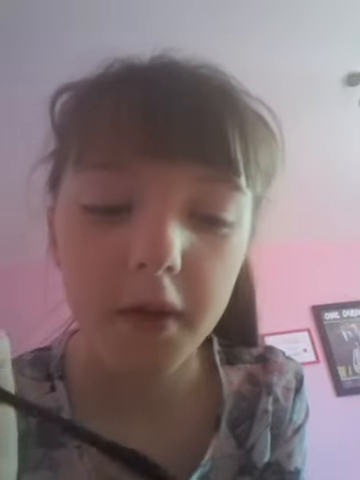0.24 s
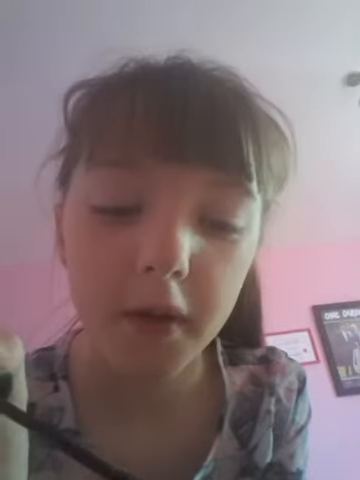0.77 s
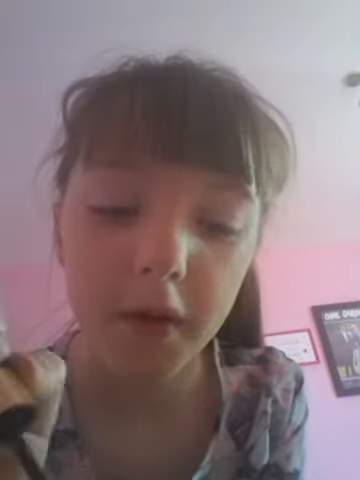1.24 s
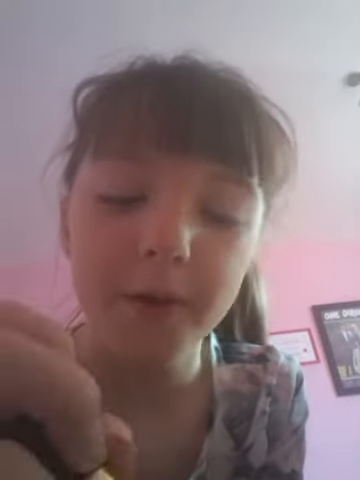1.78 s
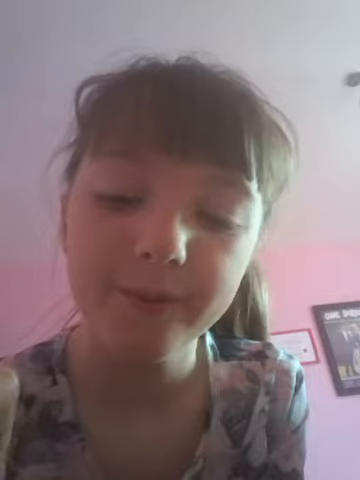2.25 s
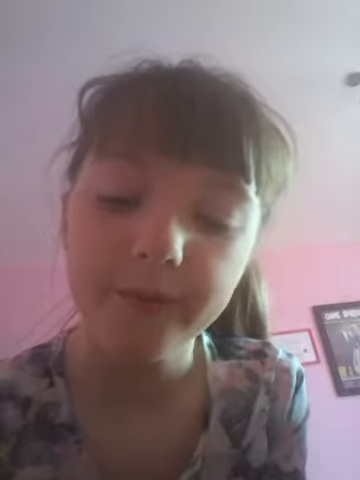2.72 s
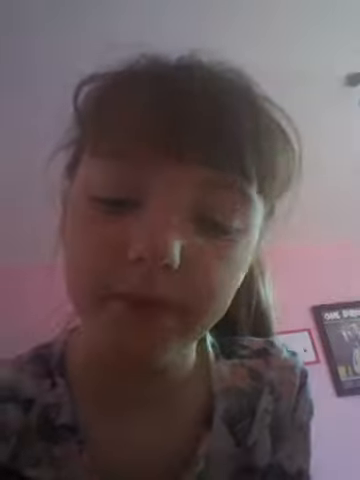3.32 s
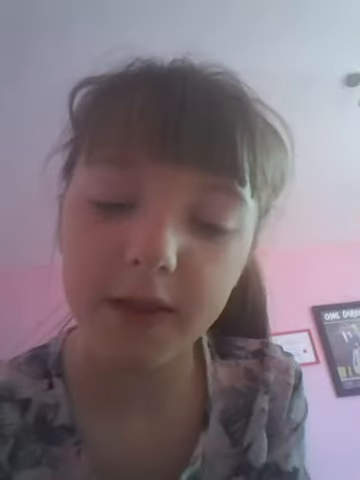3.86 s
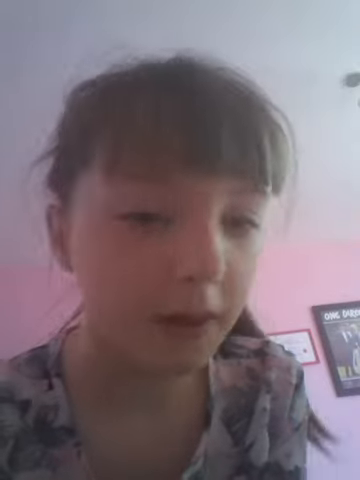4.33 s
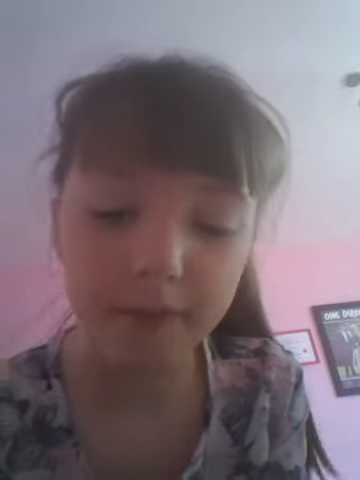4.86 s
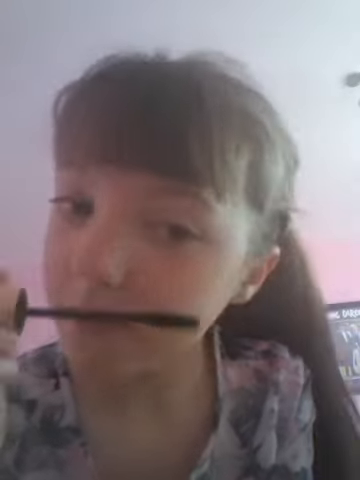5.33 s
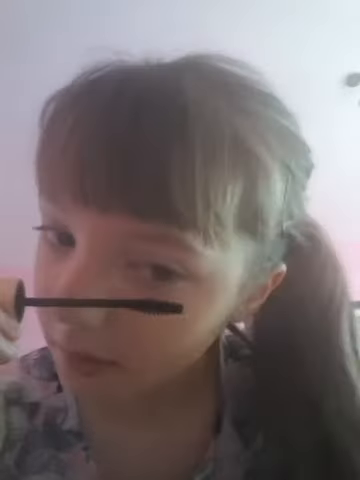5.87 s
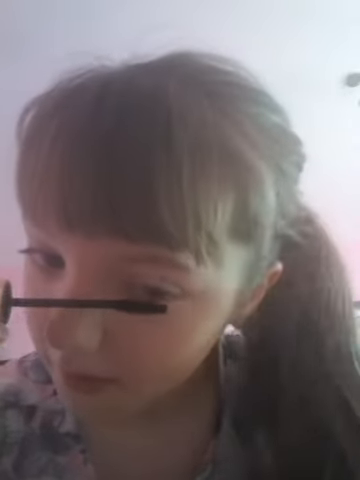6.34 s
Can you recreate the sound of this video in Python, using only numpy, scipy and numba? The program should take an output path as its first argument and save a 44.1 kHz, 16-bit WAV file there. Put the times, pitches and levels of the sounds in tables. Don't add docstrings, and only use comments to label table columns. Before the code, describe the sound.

A mascara tube is handled very close to a stereo phone microphone in a quiet small bedroom. From 0 to 0.9 s there are only faint finger rubs on plastic over low hiss. At about 1.0 s a soft grip bump leads into a crisp bristly pull with a sharp knock at 1.1 s. Clicks crowd together near 1.27 s, and at 1.31 s a hard, bright plastic snap overloads the microphone, by far the loudest moment. Rasping trails off by 1.4 s. A small tick comes at 1.68 s, then gritty brush pulls and clicks at 2.0 and 2.15 to 2.35 s. Light finger shifts and dull bumps follow near 2.8 to 3.1 s, thin rim scrapes at 3.2 to 3.5 s. From 4.2 to 5.6 s the cap twists faintly, with a clear click at 5.15 s. A tap at 5.74 s, last scrapes and finger rubs fade by 6.4 s as gated hiss and rumble sink.

```python
import sys
import numpy as np
from scipy import signal
from scipy.fft import rfft, irfft
from scipy.io import wavfile
from scipy.ndimage import uniform_filter1d
from numba import njit

SR = 44100
rng = np.random.default_rng(int(sys.argv[2]) if len(sys.argv) > 2 else 0)


def undo_db(level):
    steps = np.asarray(level, float) / 20
    return 10 ** steps


def wav_out(sig):
    wavfile.write(sys.argv[1], SR, np.round(np.clip(np.atleast_2d(sig).T, -1, 1) * 32767).astype(np.int16))


N = 290619

# peak t/s, level/dB, rise/s per 20 dB, fall/s per 20 dB, upper ring f/Hz
PULLS = [(1.021, -61, .015, .035, 5400), (1.076, -59, .035, .09, 5500), (1.108, -42, .04, .009, 6000),
         (1.19, -74, .3, .25, 5100), (1.259, -46, .005, .045, 7100), (1.276, -39.5, .016, .024, 5700),
         (1.301, -46.5, .016, .045, 5670), (1.327, -44, .022, .09, 5600), (1.385, -55, .045, .075, 5200),
         (1.636, -67, .06, .11, 5300), (1.679, -61, .05, .06, 5600), (1.975, -56, .004, .09, 6500),
         (1.996, -49.5, .022, .09, 6450), (2.021, -47, .035, .045, 6000), (2.046, -53, .035, .035, 5200),
         (2.171, -69, .025, .09, 5600), (2.216, -63, .045, .11, 4800), (2.261, -57.5, .045, .09, 5000),
         (2.291, -53.5, .035, .09, 5600), (2.313, -50.5, .035, .05, 5684), (2.332, -39.5, .013, .025, 5970),
         (2.342, -44.5, .022, .007, 6500), (2.371, -67, .035, .09, 5800)]
# peak t/s, level/dB, upper ring f/Hz, tube ring above it level/dB
TURNS = [(4.21, -61, 6420, -5.5), (4.268, -62, 5230, -10), (4.398, -67.5, 5300, -3),
         (4.5, -62.5, 5250, -3.5), (4.61, -68, 5300, 3.5), (4.73, -65.5, 5500, -2), (4.8, -68, 5400, 3.5),
         (4.87, -71.5, 5300, -1), (4.956, -61.5, 5500, -5.5), (5.07, -64.5, 5303, -1.5),
         (5.11, -67, 5338, -2), (5.175, -62.5, 5600, -4.5), (5.21, -64.5, 5597, -7), (5.28, -70, 5597, 2),
         (5.331, -64, 5600, -1), (5.433, -68.5, 5706, -2.5), (5.559, -64, 5588, -1),
         (5.61, -69.5, 5600, -2.5)]
# peak t/s, level/dB, upper ring f/Hz
SCRAPES = [
    (3.192, -64, 6090),
    (3.235, -62.5, 6126),
    (3.282, -59, 6220),
    (3.34, -62, 6156),
    (3.396, -60.5, 6097),
    (3.46, -65, 5690),
    (3.528, -63.5, 5910),
    (5.765, -69, 6250),
    (5.86, -72.5, 6150),
    (5.958, -75, 5960),
]
# peak t/s, level/dB, upper ring f/Hz
FINGER_SHIFTS = [(.16, -75, 5974), (.24, -77, 5794), (.338, -76.5, 5796), (.44, -79.5, 5907),
                 (.6, -78.5, 5916), (.67, -75.5, 5800), (.734, -74.5, 5620), (.88, -71.5, 5965),
                 (2.784, -73.5, 6150), (2.874, -71, 5612), (2.932, -71, 6020), (3.0, -72.5, 5812),
                 (3.08, -75, 6030), (3.76, -72.5, 5785), (3.822, -71, 5780), (6.09, -79.5, 5843),
                 (6.21, -75, 5950), (6.344, -81, 5705)]
# f/Hz, width/Hz, level/dB
TUBE_RINGS = [(3200, 500, 0), (3600, 900, -2.5)]
# f/Hz, width/Hz, level/dB
SHEEN_RINGS = [(4160, 1200, -6.5), (7940, 810, -23), (11500, 5300, -18.5), (2220, 2200, -7),
               (1100, 900, -22.5)]
# t/s, peak level/dB
SNAP = (1.31135, 2.7)
# f/Hz, t60/s, left level/dB, right level/dB
SNAP_RINGS = [(940, 0.01, -28.5, -24), (1978, 0.0084, -17.5, -11.5), (2734, .013, -19.5, -5.5),
              (3480, 0.0051, -23.5, -24), (4120, 0.0066, -12, -11), (5660, 0.0067, -2.5, 0.5),
              (6450, 0.0057, -9.5, -15), (6950, 0.013, -8, -16), (7440, 0.0077, -18, -19.5),
              (11530, 0.0048, -20.5, -23), (13500, .004, -23.5, -25.5)]
# t/s, peak level/dB, f/Hz, left minus right level/dB
TICKS = [(1.091, -32, 5150, -2), (1.1101, -29.5, 6260, -9), (1.2575, -36, 7300, 12),
         (1.2708, -28.5, 1880, -3), (1.2748, -22.5, 5301, 4), (1.2857, -29.5, 6650, 13),
         (1.2922, -27.5, 4993, -2), (1.3214, -24, 5694, -9), (1.6766, -42, 5250, 7.5),
         (1.9742, -44.5, 1922, -10), (2.0064, -37.5, 6420, 9.5), (2.0155, -30.5, 6420, 8.5),
         (2.022, -28, 5830, 2), (2.0403, -33.5, 4700, 0.5), (2.1514, -48, 5490, -11.5),
         (2.2638, -37, 4540, 0), (2.2830, -34, 5750, 10.5), (2.3216, -28, 4150, 3), (2.3275, -28, 2000, -2),
         (2.3298, -29.5, 6030, 4.5), (3.2915, -42.5, 7996, 4), (3.2917, -45.5, 12000, 12),
         (3.3596, -47.5, 8200, 6), (5.1520, -24.5, 4760, -5.5), (5.7385, -41.5, 2880, 4.5)]
# t/s, peak level/dB, f/Hz, left minus right level/dB
TAPS = [(1.2747, -28, 2780, 4), (3.389, -45.5, 3190, 5), (3.7614, -55, 2864, 6), (4.206, -38, 6750, 7),
        (4.2061, -44, 5590, 0), (4.2266, -45.5, 6900, 15.5), (4.4933, -49, 5050, 1.5),
        (5.5644, -54, 3470, 3.5), (5.7376, -45.5, 2074, -2.5), (5.7374, -42, 5300, -5.5),
        (5.7378, -49, 4400, 0), (5.739, -52.5, 8300, 6)]
# t/s, peak level/dB
KNOCKS = [
    (1.0928, -57),
    (1.1105, -27.5),
    (1.2575, -47),
    (1.2748, -41),
    (1.6757, -53),
    (2.151, -46.5),
    (5.564, -52.5),
    (5.7371, -52),
]
# t/s, peak level/dB, f/Hz, t60/s
THUMPS = [
    (.995, -55, 295, .05),
    (1.375, -46, 350, 0.04),
    (2.782, -52, 454, 0.083),
    (3.029, -52, 250, 0.079),
    (3.18, -54.5, 603, .05),
    (5.563, -50.5, 298, .05),
]
# opening t/s, held/s, hiss level/dB, rumble above hiss level/dB, rise/s per 20 dB
GATE_OPENINGS = [(.13, 0.17, -81, 2.5, 0.4), (.52, .33, -81.5, 2, -0.6), (1.0, 0.031, -78.5, 11.5, 0.05),
                 (1.07, 0.19, -71.5, 3.5, -0.03), (1.329, .05, -66.5, 1.5, 0.17),
                 (1.649, 0.057, -73.5, 6, .2), (1.98, 0.084, -73.5, 5.5, -0.5), (2.2, .2, -74, 5.5, 0),
                 (2.785, .03, -75.5, 4, 0), (2.95, 0.13, -80.5, 8, 0.5), (3.2, 0.37, -72, 6, .05),
                 (3.77, 0.042, -76.5, 2.5, 0.57), (4.02, 0.12, -74.5, 2.5, -0.1), (4.22, 0.11, -75, 4, .1),
                 (4.5, 0.32, -77.5, 4, -0.45), (4.95, 0.14, -78, 3.5, 0.3),
                 (5.17, 0.053, -75.5, 4.5, -0.04), (5.33, .1, -79, 4, 0.5), (5.56, 0.058, -75.5, 5, -0.26),
                 (5.75, .04, -72.5, 4, .05), (5.9, .06, -78.5, 4.5, 0.6), (6.2, .1, -81, 5.5, 0.6)]
# f/Hz, level/dB per Hz
HISS = [(290, -41), (500, -7), (694, -4.5), (909, -8), (1830, -7), (2330, -7.5), (2680, -5.5), (3990, -8.5),
        (6030, -7.5), (14000, -12.5), (15000, -18)]
# f/Hz, level/dB per Hz
RUMBLE = [(12, -37), (20, -9.5), (22, -6.5), (86, 2), (265, -8.5), (373, -11), (545, -15.5), (677, -20),
          (1500, -24), (1950, -50.5), (3300, -120)]


def rubbing():
    db, hz, tube_db, pan_db, width = strokes()
    effort = np.clip((db + 70.5) / 24, .2, 1)
    shared = bristles(effort)
    ports = []
    for side in (1, -1):
        grains = .6 * np.roll(shared, -3 * side) + bristles(effort)
        centre = hz * (1 + .015 * side)
        upper = svf(svf(grains, centre, width), centre, 0.91 * width)
        upper = level(upper, 0) * np.sqrt(1200 / width)
        sheen = level(rings(grains, SHEEN_RINGS), 0.31) * undo_db(2.33 * (effort - 2.5))
        tube = undo_db(tube_db) * level(rings(grains, TUBE_RINGS), 0.5)
        ports.append(undo_db(db + 3.0 + side * pan_db / 2) * (upper + sheen + tube))
    return np.array(ports)


def strokes():
    # t/s, held/s, level/dB, rise/s, fall/s, f/Hz, tube ring/dB, left minus right/dB, width/Hz
    rows = [(s, 0, db, rise, fall, hz, -9.5, 3.5, 2000) for s, db, rise, fall, hz in PULLS]
    rows += [(s, 0, db, .045, .115, hz, tube_db, 2.5, 1500) for s, db, hz, tube_db in TURNS]
    rows += [(s, 0, db, .07, .12, hz, -11, 3, 1500) for s, db, hz in FINGER_SHIFTS]
    rows += [(s, 0, db, .06, .22, hz, -15.5, 2, 900) for s, db, hz in SCRAPES]
    return blend(rows)


def bristles(effort):
    ticks_per_s = 6000
    uneven_db = 2.5 * np.minimum(rng.exponential(size=N), 4) + 3.5 * flicker(200.)
    released = rng.random(N) < ticks_per_s / SR
    grains = released * rng.standard_normal(N) * undo_db(effort * uneven_db + 1.1 * flicker(20.0))
    return grains / np.sqrt(uniform_filter1d(grains ** 2, size=2000) + 1e-12)


def snap():
    snap_s, snap_db = SNAP
    out = np.zeros((2, N))
    for port, lag_s in enumerate((0, 1 / 5660)):
        blow = 0
        for n, (hz, t60, *port_db) in enumerate(SNAP_RINGS):
            blow = blow + (-1) ** n * undo_db(port_db[port]) * ring(hz, t60, .00008)
        add(out[port], snap_s + lag_s, undo_db(snap_db) * blow)
        crack = undo_db(-3.5) * ring(3700, .0035, .0001)
        crack += undo_db(-14.5) * ring(8400, .004, .00005)
        crack += undo_db(-30.5) * ring(16000, .008, .0001)
        add(out[port], snap_s + .00005, crack)
        slip = undo_db(-15) * ring(2300, 0.0062, .0003)
        add(out[port], snap_s - .0008, slip)
    return out


def ticks():
    tick_t60_s, tap_t60_s = 0.0048, .016
    rows = [(*row, tick_t60_s) for row in TICKS] + [(*row, tap_t60_s) for row in TAPS]
    turns = rng.random((len(rows), 6))
    knock = ring(670, 0.01, .0002)
    out = np.zeros((2, N))
    for (s, db, hz, pan_db, t60), turn in zip(rows, turns):
        for port, (side, port_hz) in enumerate(((1, 6400), (-1, 5400))):
            sound = ring(hz, t60, .0001)
            sound += undo_db(-6.5) * ring(port_hz, .006, .00005, turn[port])
            sound += undo_db(-13.5) * ring(3000, 0.0045, .00005, turn[2 + port])
            sound += undo_db(-18.5) * ring(9500, .002, .00003, turn[4 + port])
            sound += undo_db(-30.5) * knock
            add(out[port], s + port * .00005, undo_db(db + .5 + side * pan_db / 2) * sound)
    for s, db in KNOCKS:
        add(out[0], s, undo_db(db - 3.0) * knock)
        add(out[1], s, undo_db(db + 2.5) * knock)
    return out


def thumps():
    out = np.zeros(N)
    for s, db, hz, t60 in THUMPS:
        bump = ring(hz, t60, 0.0016) + ring(hz * 0.66, t60, 0.0024)
        add(out, s, undo_db(db) * bump)
    return np.array([out, -.3 * out])


def room(x):
    t60_s, room_db, first_wall_s = .28, -37, .004
    t = np.arange(int(.6 * SR)) / SR
    decay = np.exp(-np.log(1000) * t / t60_s)
    tail = rng.standard_normal((2, len(t))) * decay * (t > first_wall_s)
    return undo_db(room_db - 15.5) * signal.fftconvolve(x, tail, axes=1)[:, :N]


def phone():
    hiss_db, rumble_db = gate()
    hiss = np.array([level(coloured(HISS), 5.2) for _ in range(2)])
    mid = level(coloured(RUMBLE), 0)
    side = level(coloured(RUMBLE), 5)
    rumble = np.array([mid + side, mid - side])
    deep = signal.sosfiltfilt(signal.butter(2, 110, fs=SR, output="sos"), rumble)
    gated = undo_db(rumble_db + 5.5) * (rumble - deep)
    gated += undo_db(0.13 * rumble_db - 61.5) * deep
    return undo_db(hiss_db + 6.0) * hiss + undo_db(1.8 * flicker(10.0)) * gated


def gate():
    fall_s, shut_db, shut_rumble_db = .45, -83, 4
    rows = [(s, held, db, rise, fall_s, above_db) for s, held, db, above_db, rise in GATE_OPENINGS]
    rows.append((0, N / SR, shut_db, 1, 1, shut_rumble_db))
    hiss_db, above_db = blend(rows)
    return hiss_db - 1.5, hiss_db - 1.5 + above_db


def blend(rows):
    t = np.arange(0, N + 64, 64) / SR
    s, held, db, rise, fall, *values = np.transpose(rows)[:, :, None]
    before = (s - t) / np.maximum(rise, 1e-3)
    after = (t - s - held) / np.maximum(fall, 1e-3)
    away = np.maximum(np.maximum(before, after), 0)
    power = undo_db(np.maximum(db - 20 * away, -150)) ** 2
    total = power.sum(axis=0)
    columns = [10 * np.log10(total)]
    columns += [(power * v).sum(axis=0) / total for v in values]
    return [np.interp(np.arange(N) / SR, t, c) for c in columns]


def level(x, db):
    return x * undo_db(db) / np.sqrt(np.mean(x ** 2))


def coloured(spectrum):
    hz, db = np.transpose(spectrum)
    bins_hz = np.arange(N // 2 + 1) * SR / N
    gain = undo_db(np.interp(np.log(bins_hz + 1), np.log(hz), db))
    return irfft(rfft(rng.standard_normal(N)) * gain, N)


def flicker(rate):
    k = int(SR / rate)
    steps = np.repeat(rng.standard_normal(N // k + 1), k)
    return uniform_filter1d(steps, k)[:N]


@njit
def svf(x, hz, width):
    y, band, low = np.empty(len(x)), 0., 0.
    for i in range(len(x)):
        g, k = np.tan(np.pi * hz[i] / SR), width[i] / hz[i]
        v = (band + g * (x[i] - low)) / (1 + g * (g + k))
        band, low, y[i] = 2 * v - band, low + 2 * g * v, k * v
    return y


def rings(x, table):
    out = np.zeros(N)
    for hz, width, db in table:
        centre = np.full(N, 1. * hz)
        once = svf(x, centre, np.full(N, 1. * width))
        twice = svf(once, centre, np.full(N, 1.7 * width))
        out += undo_db(db) * twice / np.sqrt(width)
    return out


def ring(hz, t60, rise_s, turn=0.):
    t = np.arange(int(.04 * SR)) / SR
    envelope = (1 - np.exp(-t / rise_s)) * np.exp(-np.log(1000) * t / t60)
    return envelope * np.sin(2 * np.pi * (hz * t + turn))


def add(out, s, sound):
    i = int(s * SR)
    out[i:i + len(sound)] += sound[:N - i]


def scene():
    high_pass = signal.butter(2, 300, "high", fs=SR, output="sos")
    hits = signal.sosfilt(high_pass, ticks() + snap())
    return hits + room(hits) + rubbing() + thumps() + phone()


def band_limit(x):
    return signal.sosfilt(signal.butter(12, 15710, fs=SR, output="sos"), x)


def record(dry):
    clipped = np.clip(dry, -1.05, 1.05)
    top_cut = signal.ellip(8, .3, 28, 14650, fs=SR, output="sos")
    mix = np.clip(signal.sosfilt(top_cut, clipped), -1, 1)
    return band_limit(mix)


dry = scene()
out = record(dry)
wav_out(out)
```